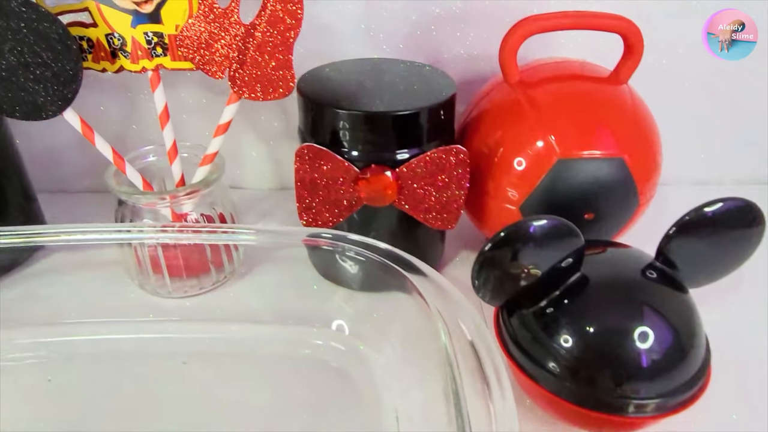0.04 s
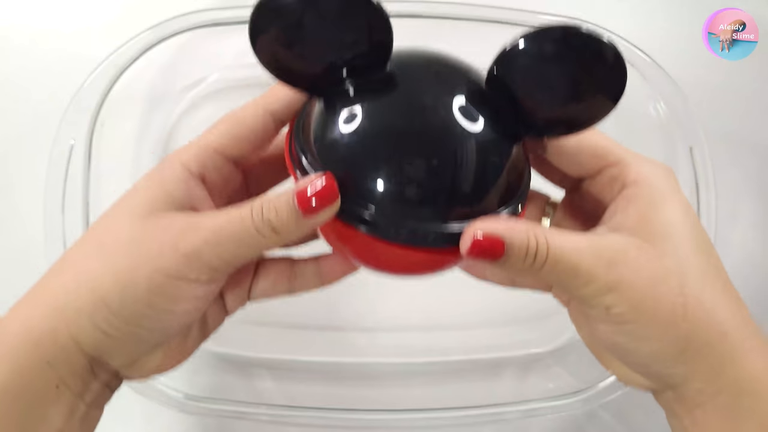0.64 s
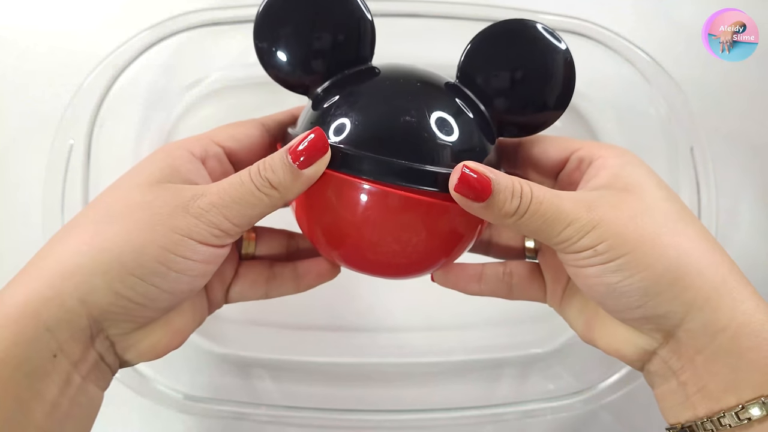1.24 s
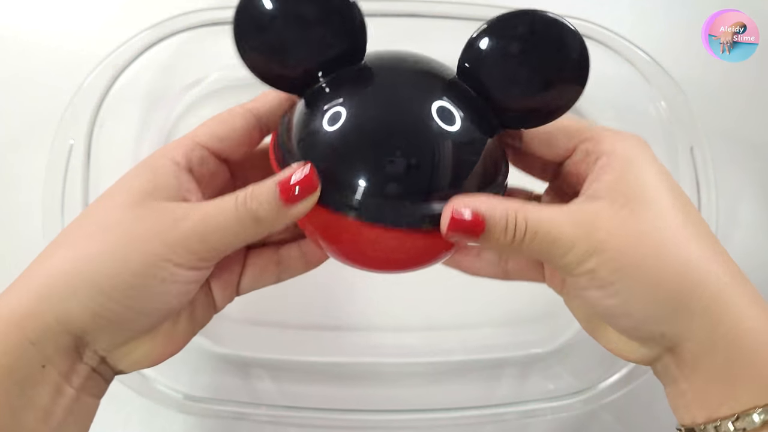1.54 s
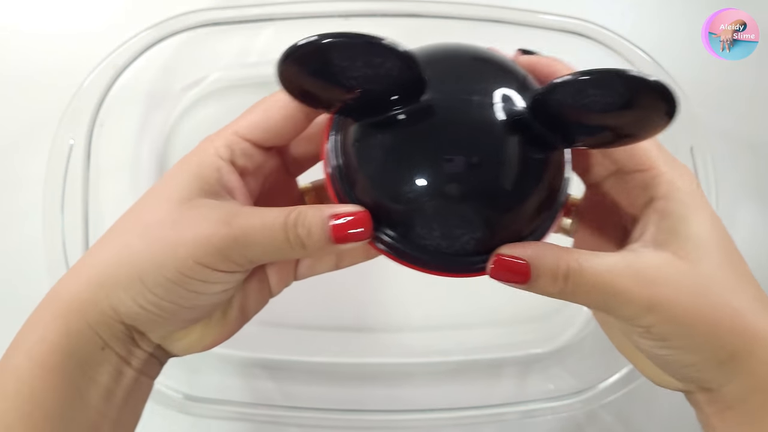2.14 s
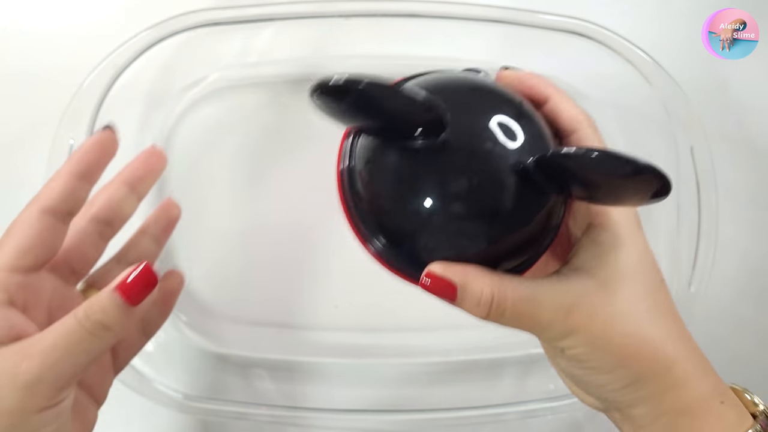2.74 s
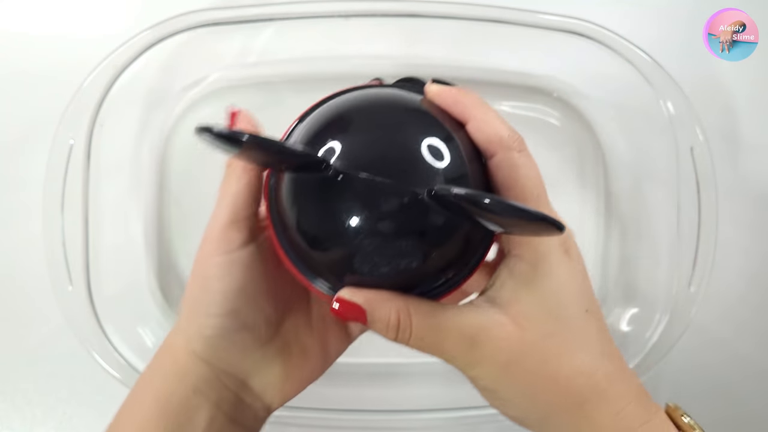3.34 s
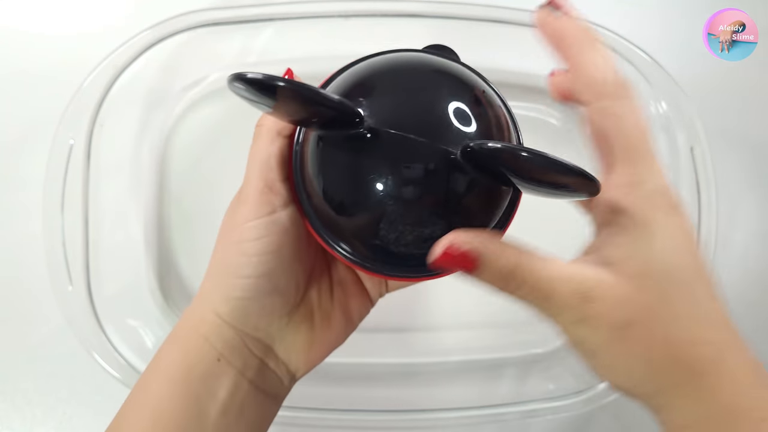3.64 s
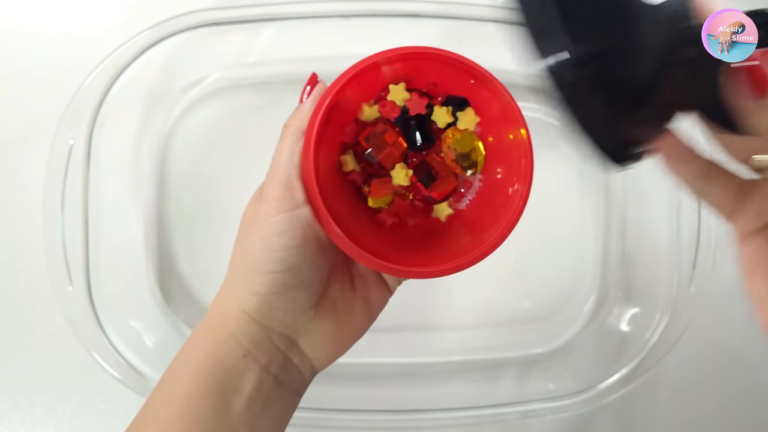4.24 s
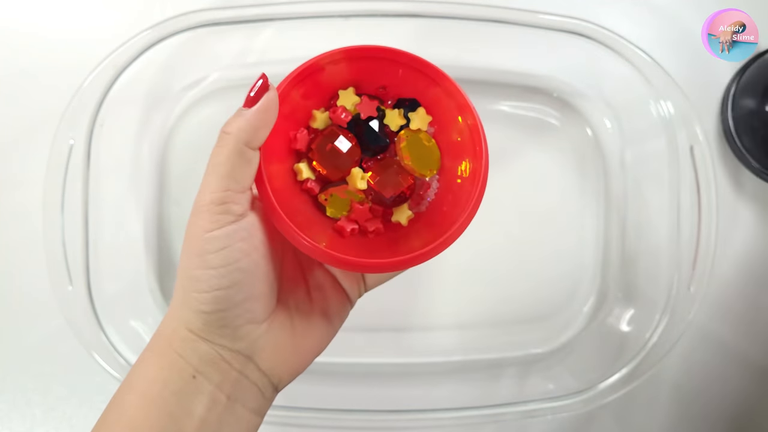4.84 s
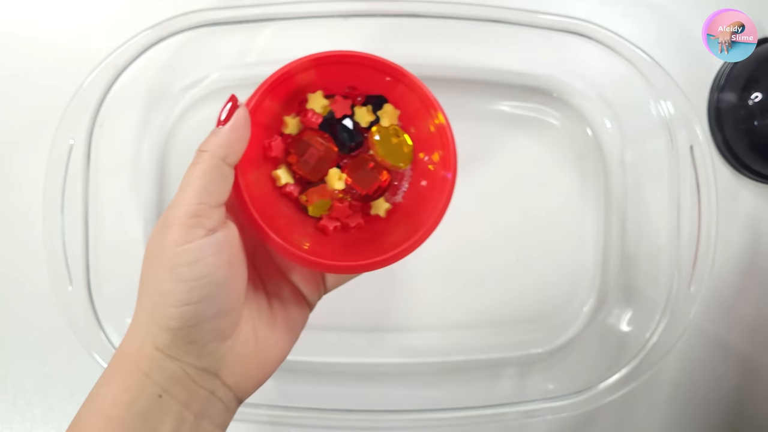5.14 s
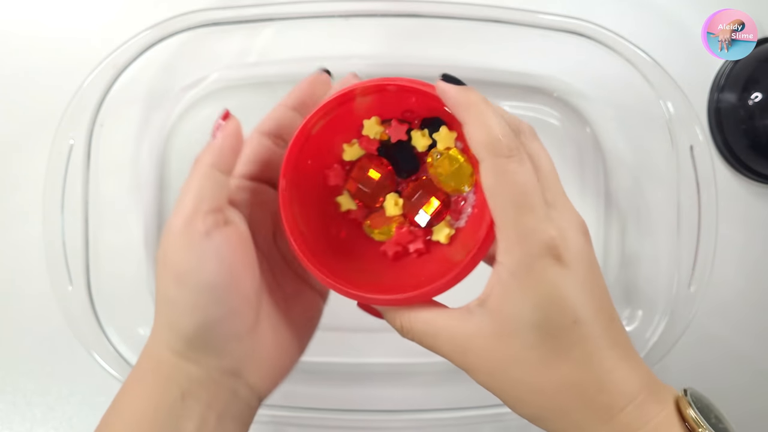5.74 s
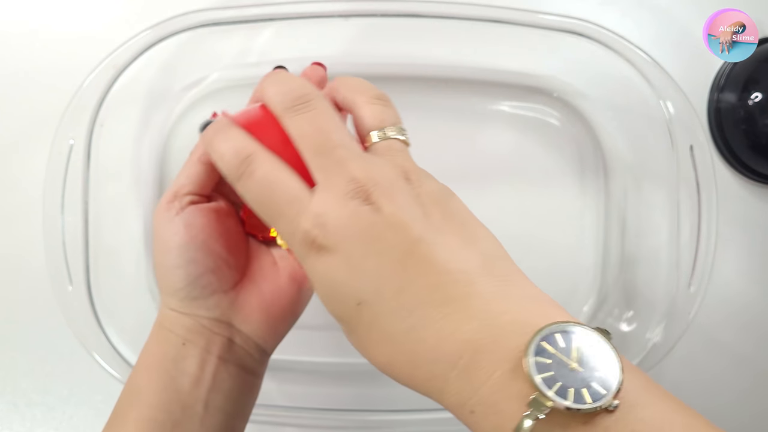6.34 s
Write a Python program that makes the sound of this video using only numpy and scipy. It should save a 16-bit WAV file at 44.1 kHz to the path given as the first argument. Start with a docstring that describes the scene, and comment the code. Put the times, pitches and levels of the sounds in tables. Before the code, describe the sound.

Small plastic gems roll and click softly inside a round plastic case as it is turned, then rattle loudly as it is shaken, the hollow shell ringing. The lid eases off with dull bumps and a soft pop, then knocks on the table. The gems tick and pour briefly into a palm. A close stereo microphone picks this up in a small, hard-walled room with low ventilation rumble.

```python
"""Over low ventilation rumble, small plastic gems roll in a round plastic case as it is turned:
clumps of tiny collisions, a few harder hits and ticks. From 2.5 s it is shaken and the shell rings.
The lid is eased off with dull stick-slip bumps and a hollow pop (4.1 s), then knocks on the table
(4.9 s). The open half is tipped and the gems pour into a palm (5.9 s).
Close stereo microphone in a small, hard-walled room."""
import sys
import numpy as np
from scipy import signal
from scipy.fft import rfft, irfft, next_fast_len
from scipy.io import wavfile
from scipy.ndimage import uniform_filter1d

SR = 44100
rng = np.random.default_rng(int(sys.argv[2]) if len(sys.argv) > 2 else 0)


def generate_wav(signal):
    """Clip the signal to [-1, 1] and save it as 16-bit WAV at the path in sys.argv[1]."""
    frames = np.transpose(np.atleast_2d(signal))
    scaled = np.clip(frames, -1, 1) * 32767
    pcm = np.round(scaled).astype(np.int16)
    wavfile.write(sys.argv[1], SR, pcm)


N = 281799

# spectrum of light ticks and of gems in the open half: freq_hz, gain_db
OPEN_COLOUR = [(200, -17), (800, -14), (1120, -4), (1300, -7.5), (1600, -11.5), (2200, -16), (2750, -9.5),
               (3700, -7.5), (4500, -4), (5600, -4), (6800, -14.5), (11700, -13.5), (16000, -17)]


def undb(db):
    """Decibels to gain."""
    return 10 ** (np.asarray(db) / 20)


def at_hz(table, hz):
    """Read a table along a logarithmic frequency axis."""
    f, value = np.transpose(table)
    return np.interp(np.log(np.maximum(hz, 1)), np.log(f), value)


def colour(x, spectrum):
    """Minimum-phase filter with the given spectrum."""
    n = 2 * next_fast_len(x.shape[-1])
    gain = undb(at_hz(spectrum, np.fft.rfftfreq(n, 1 / SR)))
    cepstrum = irfft(np.log(gain), n)
    cepstrum[1:n // 2] *= 2
    cepstrum[n // 2 + 1:] = 0
    return irfft(rfft(x, n) * np.exp(rfft(cepstrum)), n)[..., :x.shape[-1]]


def level(x, rms_db):
    """Set the rms level."""
    return x * undb(rms_db) / np.sqrt(np.mean(x ** 2))


def spread(mid, side):
    """Left and right: alike in the bass, unrelated in the treble."""
    # side against mid: freq_hz, gain_db
    width = [(60, -16), (200, -17), (400, -11), (800, -4.5), (1500, -2), (4000, -.3), (12000, .8)]
    side = colour(side, width)
    return np.array([mid + side, mid - side])


def add(out, start_s, x):
    """Mix a short sound in."""
    i = max(int(start_s * SR), 0)
    part = out[:, i:i + x.shape[-1]]
    part += x[:, :part.shape[-1]]


def fade(t, t60_s):
    """Exponential decay."""
    return np.exp(-np.log(1000) * t / t60_s)


def ventilation():
    """Air rumble with a wavering hum."""
    # rumble spectrum: freq_hz, gain_db
    air_colour = [(25, -44.5), (36, -8.5), (48, -5.5), (62, 2.5), (100, -14.5), (170, -11), (270, -0.5),
                  (480, -10), (700, -20.5), (1100, -23.5), (2050, -30), (2800, -42), (6000, -50),
                  (16000, -47)]
    # hum tones: pitch_hz, rms_db
    hum = [(64.5, -68), (131, -63.5)]
    # fade-in: time_s, gain_db
    fade_in = [(0, -9), (.16, -10), (.2, 0)]
    t = np.arange(N) / SR
    noise = spread(*rng.standard_normal((2, N)))
    x = level(colour(noise, air_colour), rms_db=-52.3)
    for hz, db in hum:
        waver = np.interp(t, np.linspace(0, t[-1], num=40), rng.standard_normal(size=40))
        x += level(np.sin(2 * np.pi * hz * t + waver) * (1 + 0.27 * waver), db)
    return x * undb(np.interp(t, *np.transpose(fade_in)))


def gems(moves, spectrum, settle_db_per_s, hits_per_s, scatter_db, clump_db, click_t60_s, size=512):
    """A moving heap gathers speed, flows and settles: tiny collisions of varied strength and pitch."""
    out, t = np.zeros((2, N)), np.arange(size) / SR
    rise_db, facets, count = 26, 64, 1000
    for full_s, rise_s, hold_s, db, _ in moves:
        times = full_s - 1.5 * rise_s + np.cumsum(rng.exponential(size=count)) / hits_per_s
        # one falling gem sets off its neighbours
        clumps = np.repeat(rng.standard_normal(size=count), repeats=8)[:count]
        strength = undb(scatter_db * rng.standard_normal(count) + clump_db * clumps)
        # collisions close in time share the heap's energy
        strength /= np.sqrt(uniform_filter1d(strength ** 2, size=31))
        age_s = times - full_s
        flow_db = rise_db * np.minimum(age_s, 0) / rise_s
        flow_db -= settle_db_per_s * np.maximum(age_s - hold_s, 0)
        strength *= undb(db + flow_db) * np.sqrt(SR / hits_per_s)
        pitch_hz = rng.uniform(1533, 9000, size=(facets, 1, 1))
        tone = np.sin(2 * np.pi * (pitch_hz * t + rng.random(size=(facets, 2, 1))))
        clicks = (rng.standard_normal(size=(facets, 2, size)) + 0.68 * tone) * fade(t, click_t60_s)
        clicks /= np.sqrt(np.sum(clicks ** 2, axis=-1, keepdims=True))
        moving = flow_db > -50
        for start_s, gain, k in zip(times[moving], strength[moving], rng.integers(facets, size=count)):
            add(out, start_s, gain * clicks[k])
    # the shell sounds below 6.3 kHz; above it facets scrape, at scrape_db relative to the shell
    x = colour(out, spectrum)
    shell = signal.sosfiltfilt(signal.butter(8, 6300, fs=SR, output="sos"), x)
    scrape = x - shell
    full_s, _, hold_s, _, scrape_db = np.transpose(moves)
    edges_s = np.column_stack([full_s, full_s + hold_s]).ravel()
    scrape *= undb(np.interp(np.arange(N) / SR, edges_s, np.repeat(scrape_db, 2))) / scrape.std()
    return spread(*(shell / shell.std() + scrape) * out.std())


def contact(spectrum, crack_t60_s, body_t60_s, body_db, push_db=9, size=16384):
    """One impact, peak near 1: a push, a crack and the body's brief, dense ring."""
    t = np.arange(size) / SR
    envelope = fade(t, crack_t60_s) + undb(body_db) * fade(t, body_t60_s)
    x = spread(*rng.standard_normal((2, size)) * envelope)
    x[:, 0] += undb(push_db)  # same in both channels
    x = colour(x, spectrum)
    power = uniform_filter1d(np.mean(x ** 2, axis=0), size=96)
    return x / np.sqrt(4 * power.max())


def ring(modes, size=16384):
    """Damped modes, each reaching the two microphones with its own lags."""
    t = np.arange(size) / SR
    lags_s = rng.uniform(0, .0002, (len(modes), 2, 1))
    return sum(undb(db) * fade(t, t60_s) * np.sin(2 * np.pi * hz * np.maximum(t - lag_s, 0))
               for (hz, db, t60_s), lag_s in zip(modes, lags_s))


def strikes(hits, spectrum, treble_db, ring_db, bounce_s, bounce_db, **decay):
    """Single gems hit, ring briefly and fall back on another facet."""
    # modes of one gem: pitch_hz, level_db, t60_s
    gem_modes = [(4460, -21, 0.035), (4560, -20.5, .03), (5000, -19.5, 0.033), (5440, -21, 0.07)]
    out = np.zeros((2, N))
    shelf = [(3100, 0), (6520, treble_db)]
    for start_s, db in hits:
        for delay_s, drop_db in (0, 0), (bounce_s * rng.uniform(0.46, 2), bounce_db):
            hit = contact(spectrum, size=4096, **decay) + undb(ring_db) * ring(gem_modes, size=4096)
            add(out, start_s + delay_s, undb(db + drop_db) * colour(hit, shelf))
    return out


def closed_case():
    """Gems roll, then rattle; thrown against the wall, they ring the hollow shell."""
    # turns of the case: full_flow_s, rise_s, hold_s, level_db, scrape_db
    rolls = [(0.576, .08, 0.11, -45, -2.5), (1.08, .05, 0.0038, -48, -5), (1.225, 0.061, 0.094, -55.5, -5),
             (1.37, 0.041, 0.031, -68, 0.5), (1.785, 0.12, 0.024, -45.5, -5),
             (2.08, .07, 0.022, -57.5, -2.5), (2.21, 0.12, 0.17, -73, -0.5),
             (2.452, 0.036, 0.0039, -53, -4.5)]
    # rolling spectrum: freq_hz, gain_db
    roll_colour = [(200, -16.5), (500, -16.5), (820, -1.5), (1150, -12), (1700, -1.5), (2300, -7),
                   (3000, -1.5), (3800, -4.5), (4800, 1.5), (5700, -3.5), (6500, -12), (10500, -8.5),
                   (16000, -12)]
    # larger gems hitting the wall: start_s, level_db
    hits = [(0.687, -32), (1.08, -26), (1.2115, -32.5), (1.2403, -27.5), (1.3251, -29.5), (1.727, -35.5),
            (1.7873, -22), (2.5027, -31), (2.608, -18), (2.7496, -15), (2.7587, -15), (2.788, -11),
            (2.8345, -9.5), (2.891, -16), (2.9133, -26), (2.9786, -13.5), (3.029, -16), (3.0449, -10.5),
            (3.1113, -12.5), (3.1435, -13.5), (3.2366, -19.5), (3.3313, -20.5), (3.499, -24)]
    # shake strokes: full_flow_s, hold_s, level_db, scrape_db
    shakes = [(2.567, 0.026, -37, -6), (2.636, 0.049, -32, -4.5), (2.751, 0.027, -26, -7),
              (2.828, .02, -29, -7.5), (2.902, 0.02, -30, -7.5), (2.977, 0.082, -32, -8.5),
              (3.115, 0.022, -31, -9), (3.246, 0.032, -44.5, -7), (3.318, 0.0089, -40.5, -12.5)]
    # spectrum of hits and strokes: freq_hz, gain_db
    rattle_colour = [(200, -14.5), (500, -16), (850, -12.5), (1300, -14), (1700, -10), (2000, -2.5),
                     (3000, -5.5), (4500, 0), (5500, -2.5), (6400, -15), (8200, -13), (11700, -13),
                     (16000, -15)]
    # shell modes: pitch_hz, level_db, t60_s
    case_modes = [(830, -29, .18), (1926, -21, .15), (2148, -24, .15), (2427, -24, .15), (2560, -22, .15)]
    rolling = gems(rolls, roll_colour, settle_db_per_s=301.5, hits_per_s=1100,
                   scatter_db=0.5, clump_db=-0.5, click_t60_s=0.019)
    rise_s = 0.06
    strokes = [(full_s, rise_s, *rest) for full_s, *rest in shakes]
    rattle = gems(strokes, rattle_colour, settle_db_per_s=309.5, hits_per_s=650,
                  scatter_db=3.5, clump_db=0, click_t60_s=0.015)
    rattle += strikes(hits, rattle_colour, treble_db=-7, ring_db=-6.5, bounce_s=0.002, bounce_db=-7.5,
                      crack_t60_s=0.0097, body_t60_s=0.035, body_db=-21)
    shell = signal.fftconvolve(rattle, ring(case_modes), axes=1)[:, :N]
    return rolling + rattle + undb(-24.5) * shell


def ticks():
    """Gems and fingernails tap the shell lightly."""
    # taps: start_s, level_db
    taps = [(1.5513, -46.5), (1.969, -46), (2.2015, -36), (2.3568, -44), (3.241, -28.5), (3.4062, -36.5),
            (4.5702, -36.5), (4.6727, -45.5), (4.744, -47), (5.4508, -54.5), (5.68, -32.5), (5.7798, -41),
            (6.0238, -19), (6.044, -35)]
    return strikes(taps, OPEN_COLOUR, treble_db=0.5, ring_db=4.5, bounce_s=0.0026, bounce_db=-9,
                   crack_t60_s=0.005, body_t60_s=0.032, body_db=-2.5)


def stick_slip(slips=4, growth_db=0.5):
    """Grip or rim sticks and slips on the hollow case: short runs of dull bumps."""
    # runs: start_s, length_s, level_db
    rubs = [(2.475, 0.056, -37.5), (3.947, 0.048, -30.5), (4.027, 0.11, -39.5)]
    # bump spectrum: freq_hz, gain_db
    bump_colour = [(40, -11.5), (90, -3), (128, -2), (180, -11), (265, 2), (400, -14), (700, -26),
                   (1500, -34), (5000, -57.5)]
    out = np.zeros((2, N))
    for start_s, length_s, db in rubs:
        for k in range(slips):
            bump = contact(bump_colour, crack_t60_s=0.083, body_t60_s=0.22, body_db=-14, size=8192)
            delay_s = length_s * (k + rng.uniform(0, .5)) / slips
            add(out, start_s + delay_s, undb(db + k * growth_db) * bump)
    return out


def lid(pop_s=4.124, pop_db=-41):
    """The lid clicks loose, pops off, lands on the table and rocks."""
    # knocks: start_s, level_db, treble_db
    knocks = [(3.4954, -33, 14.5), (4.8685, -8, 2), (4.8709, -19.5, -10.5), (4.8781, -21.5, -17),
              (5.0936, -31, 2)]
    # knock spectrum: freq_hz, gain_db
    knock_colour = [(80, -53), (190, -0.5), (300, 0), (450, 4.5), (650, -2), (850, 3.5), (1260, 0),
                    (1450, -9.5), (2150, -7.5), (2900, -22), (3900, -15), (5000, -29.5), (8000, -39.5),
                    (16000, -54)]
    # modes of the lid on the table: pitch_hz, level_db, t60_s
    lid_modes = [(319, -23, .28), (404, -29, .3), (432, -27, .35), (640, -28, .3), (832, -12, .2),
                 (942, -22, .14), (1131, -19, .14), (1218, -22, .14), (1275, -21, .14), (2223, -29, .2),
                 (3900, -22, .02)]
    # hollow pop as the halves part: freq_hz, gain_db
    pop_colour = [(200, -18), (780, -19), (960, 11.5), (1090, -2), (1350, -16), (1850, -4), (2700, -22),
                  (4100, -14), (6000, -26), (16000, -65)]
    out = np.zeros((2, N))
    pop = contact(pop_colour, crack_t60_s=0.037, body_t60_s=0.045, body_db=-10)
    add(out, pop_s, undb(pop_db) * pop)
    for start_s, db, treble_db in knocks:
        knock = contact(knock_colour, crack_t60_s=0.0085, body_t60_s=0.025, body_db=-12, push_db=17)
        knock += undb(-10) * ring(lid_modes)
        shelf = [(1950, 0), (3400, treble_db)]  # sharp unlatching click, duller bounces on the table
        add(out, start_s, undb(db) * colour(knock, shelf))
    return out


def open_case():
    """Gems shift in the open half, then pour over its rim."""
    # slides: full_flow_s, rise_s, hold_s, level_db, scrape_db
    slides = [(3.815, 0.028, 0.0066, -68.5, 0.5), (3.915, 0.024, 0.067, -66.5, -1.5),
              (4.572, 0.01, .004, -54.5, -8), (4.744, 0.011, 0.0055, -68, -5),
              (4.992, 0.015, 0.0026, -37.5, -5), (5.025, 0.018, 0.0049, -63, -7),
              (5.635, 0.026, 0.011, -55, -6), (5.681, .02, 0.0054, -52, -15),
              (5.88, .045, 0.055, -45.5, -3), (5.94, 0.091, 0.12, -37, -0.5),
              (6.095, 0.036, 0.0097, -40, -6.5), (6.297, 0.017, 0.059, -57, -2)]
    return gems(slides, OPEN_COLOUR, settle_db_per_s=328, hits_per_s=1500,
                scatter_db=3, clump_db=1, click_t60_s=0.015)


def room(x, gap_s=0.0025, size=32768):
    """Diffuse echoes from hard walls; the treble dies first."""
    # reverberation time: freq_hz, t60_s
    room_t60 = [(150, 1), (400, 0.95), (1000, 0.55), (5000, 0.45), (15000, 0.48)]
    noise = spread(*rng.standard_normal((2, size)))
    hz, t, cells = signal.stft(noise, SR, nperseg=256)
    cells *= fade(t, at_hz(room_t60, hz)[:, None])
    tail = signal.istft(cells, SR)[1][:, :size]
    tail *= np.clip(np.arange(size) / SR / gap_s - .5, 0, 1)
    tail /= np.sqrt(np.sum(tail ** 2, axis=1, keepdims=True))
    return signal.fftconvolve(x, tail, axes=1)[:, :N]


def scene():
    """The case is near the microphone; the lid stirs the room more."""
    near = ticks() + closed_case() + open_case() + stick_slip()
    knocks = lid()
    echoes = room(undb(-5.5) * near + undb(0.5) * knocks)
    return near + knocks + echoes + ventilation()


def record(dry):
    """Each microphone has its own colour; the deepest bass and the top are cut."""
    # left minus right: freq_hz, gain_db
    balance = [(60, -3.5), (200, 1), (380, -2), (750, 1.5), (2400, -1), (4400, -5), (8000, 0.5),
               (15000, -1)]
    low_hz, top_hz = 38, 15900
    pair = [colour(x, [(hz, sign * db / 2) for hz, db in balance]) for x, sign in zip(dry, (1, -1))]
    pair = signal.sosfilt(signal.butter(4, low_hz, "high", fs=SR, output="sos"), pair)
    return signal.sosfilt(signal.ellip(12, .1, 80, top_hz, fs=SR, output="sos"), pair)


dry = scene()
out = record(dry)
generate_wav(out)
```